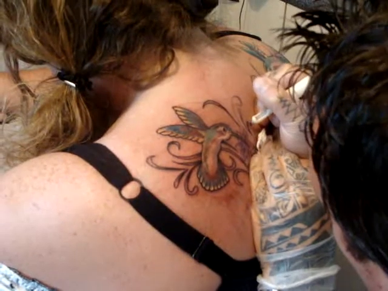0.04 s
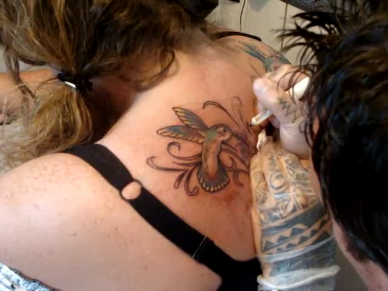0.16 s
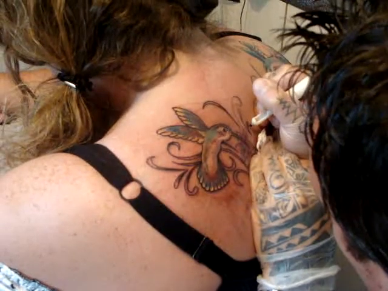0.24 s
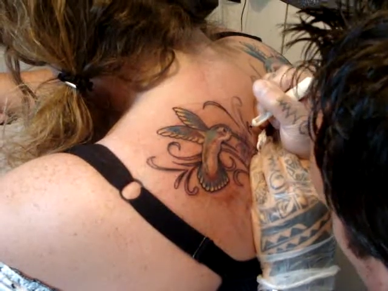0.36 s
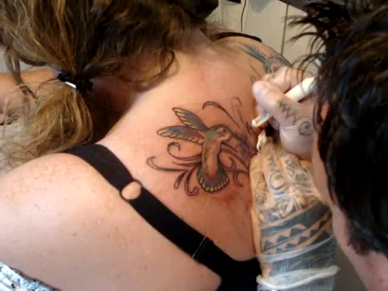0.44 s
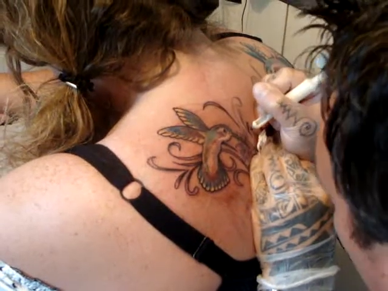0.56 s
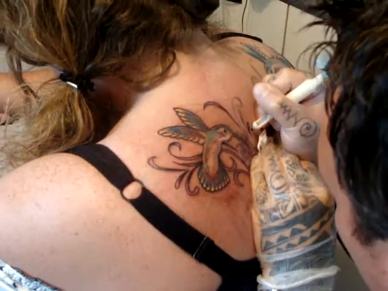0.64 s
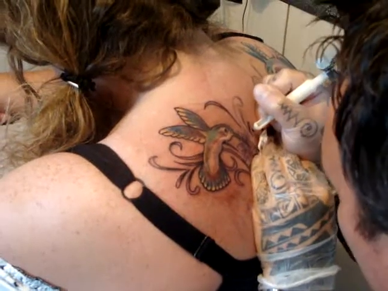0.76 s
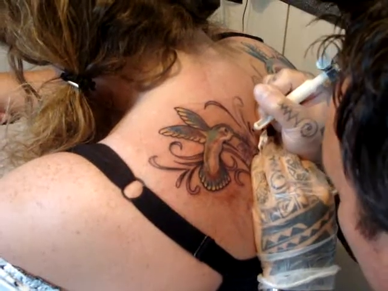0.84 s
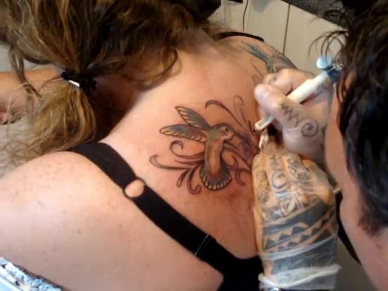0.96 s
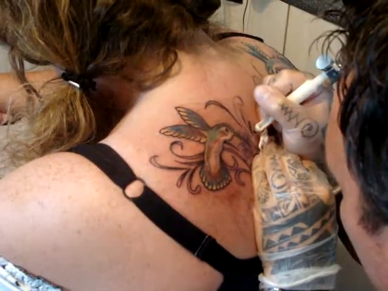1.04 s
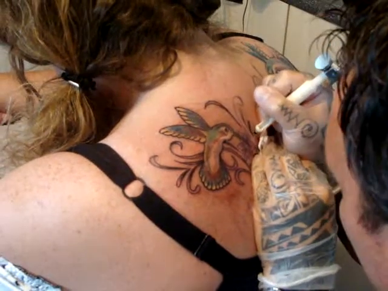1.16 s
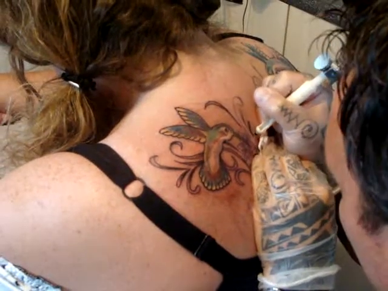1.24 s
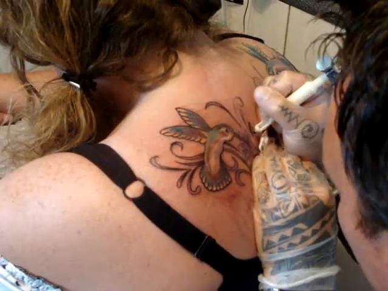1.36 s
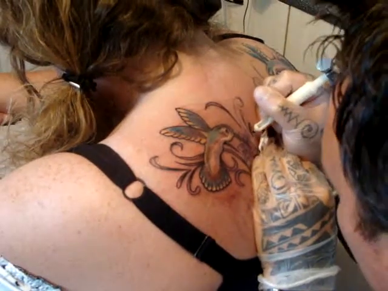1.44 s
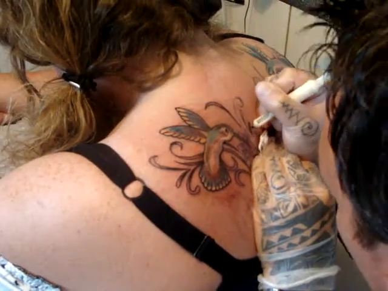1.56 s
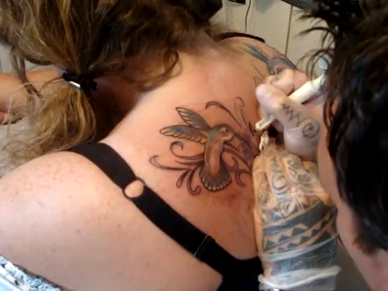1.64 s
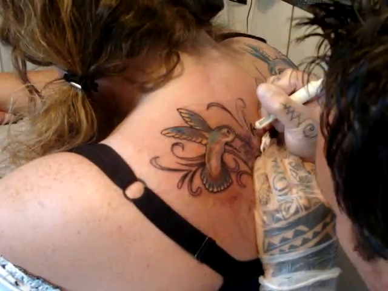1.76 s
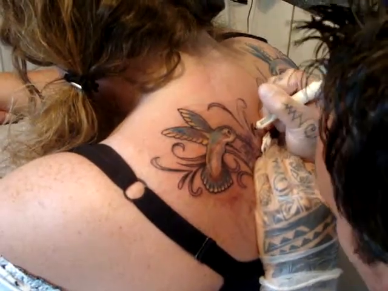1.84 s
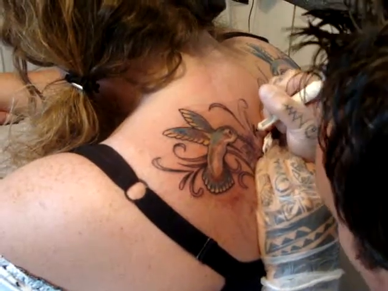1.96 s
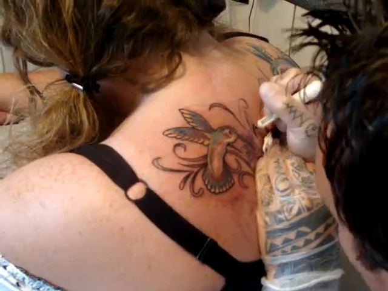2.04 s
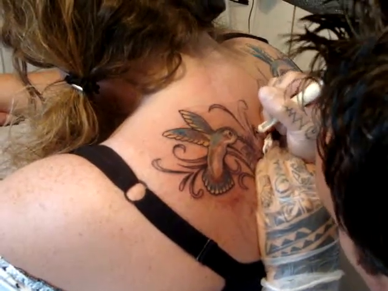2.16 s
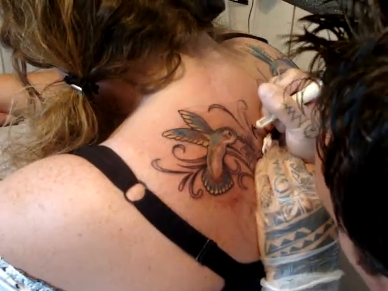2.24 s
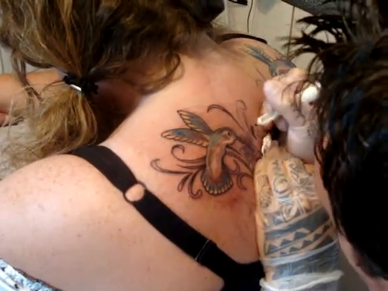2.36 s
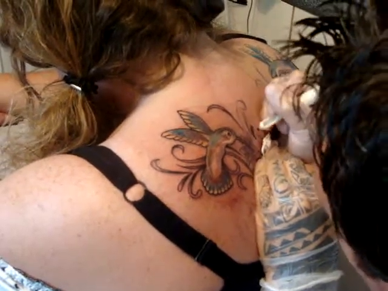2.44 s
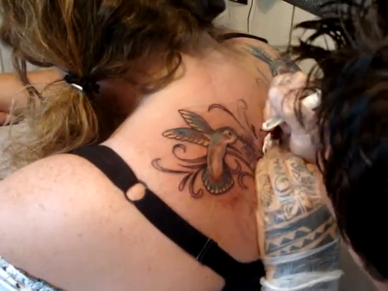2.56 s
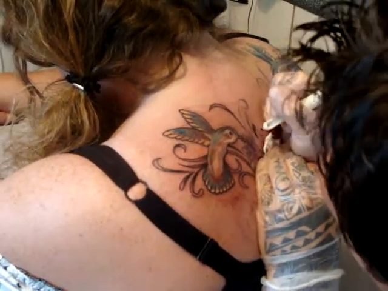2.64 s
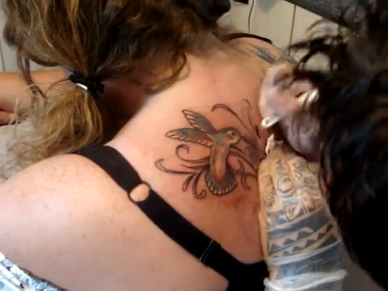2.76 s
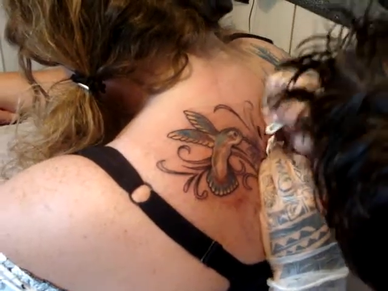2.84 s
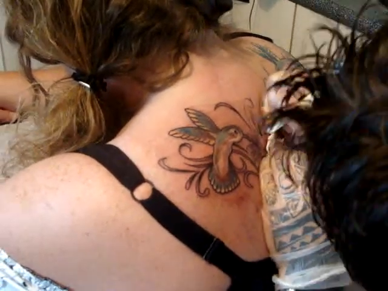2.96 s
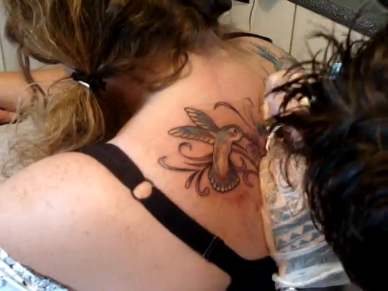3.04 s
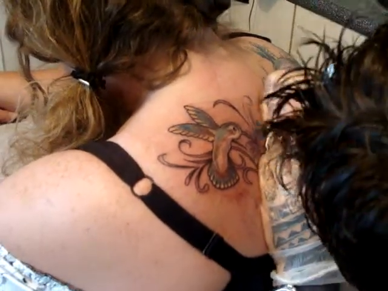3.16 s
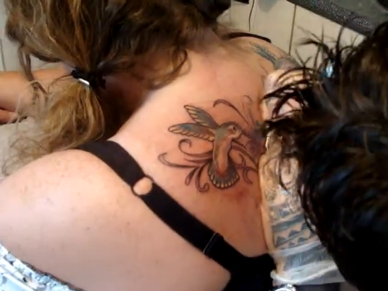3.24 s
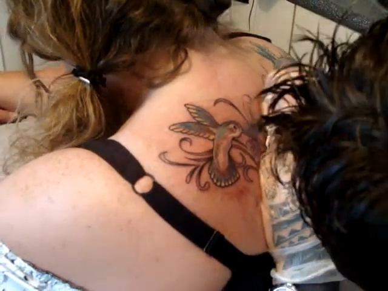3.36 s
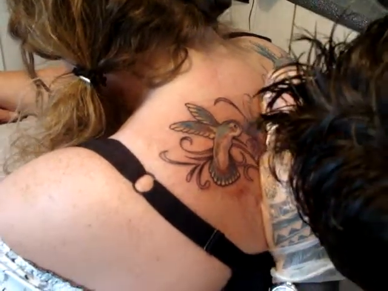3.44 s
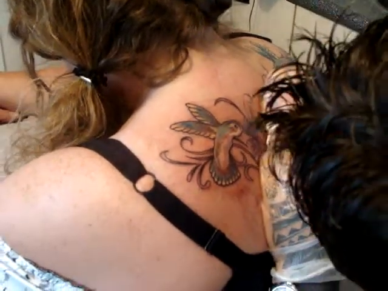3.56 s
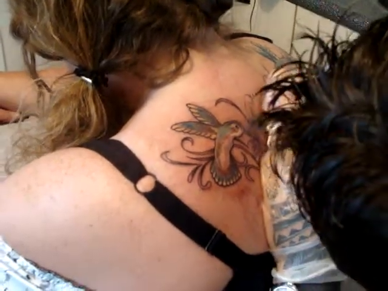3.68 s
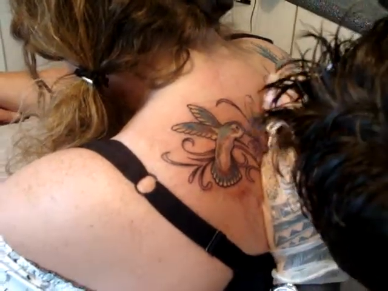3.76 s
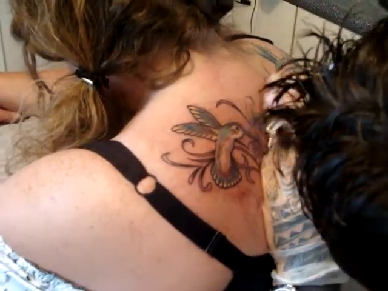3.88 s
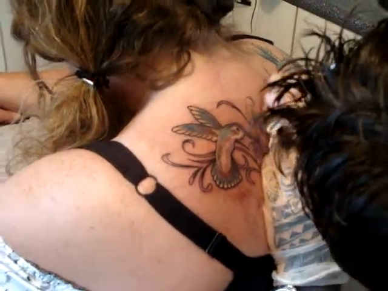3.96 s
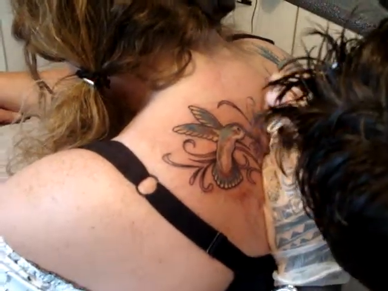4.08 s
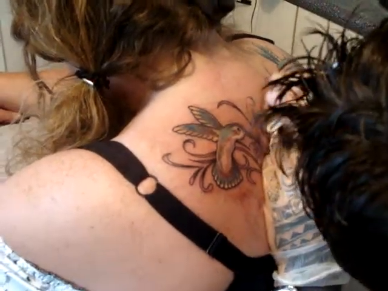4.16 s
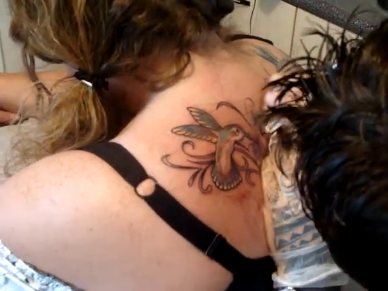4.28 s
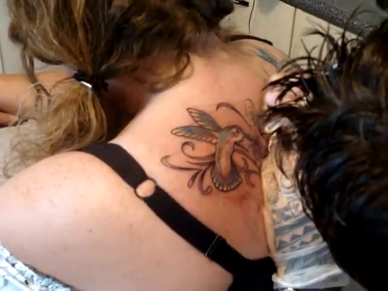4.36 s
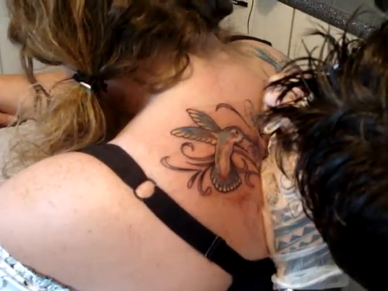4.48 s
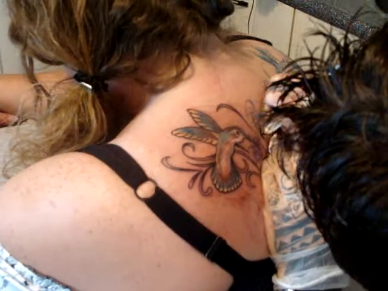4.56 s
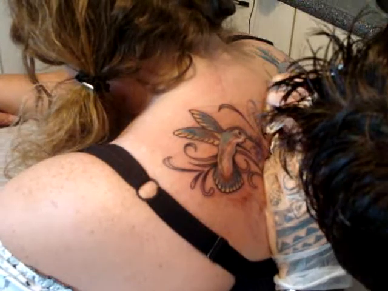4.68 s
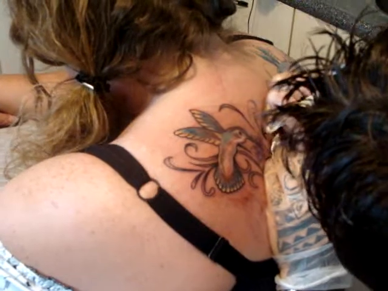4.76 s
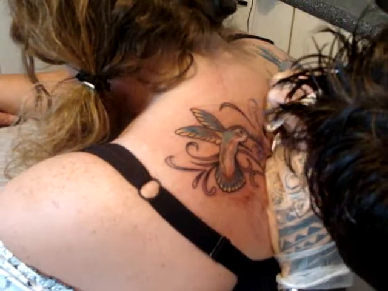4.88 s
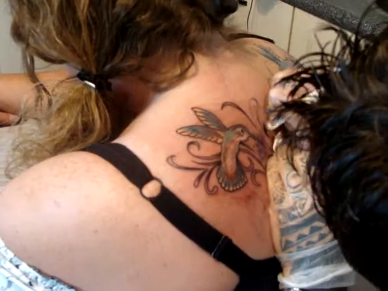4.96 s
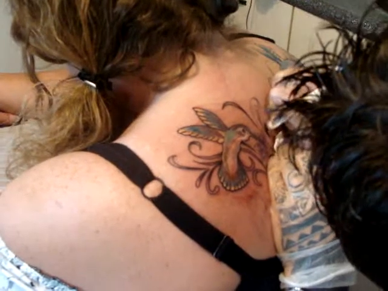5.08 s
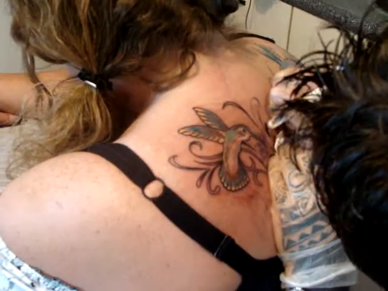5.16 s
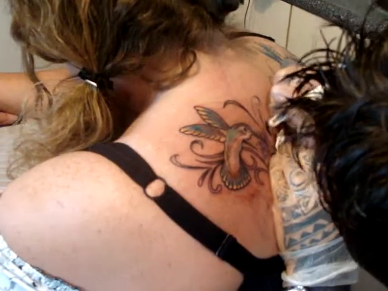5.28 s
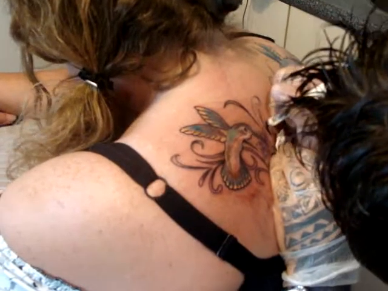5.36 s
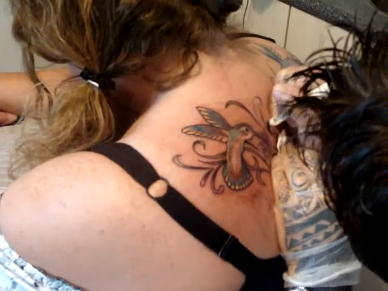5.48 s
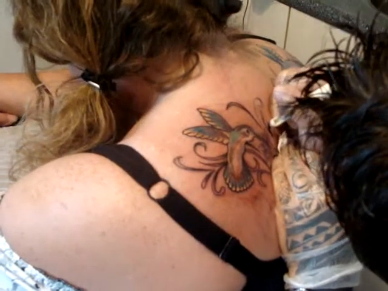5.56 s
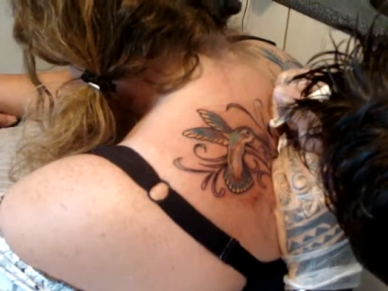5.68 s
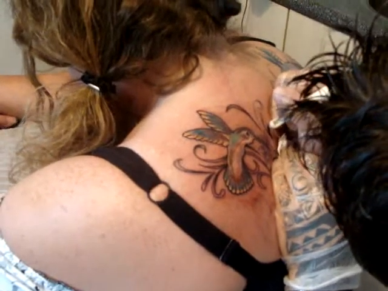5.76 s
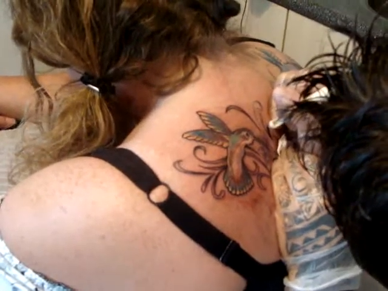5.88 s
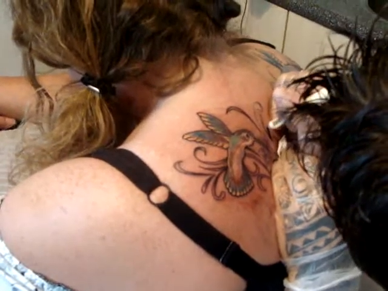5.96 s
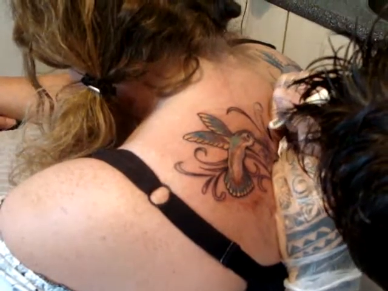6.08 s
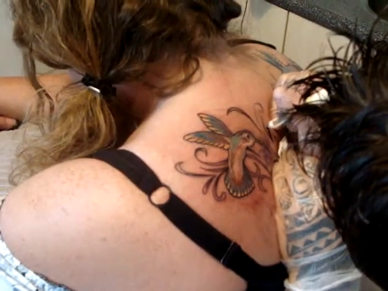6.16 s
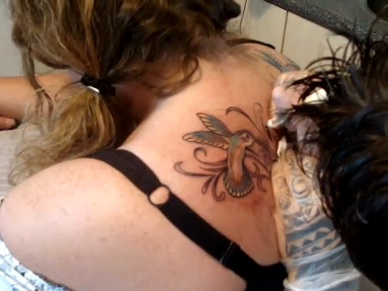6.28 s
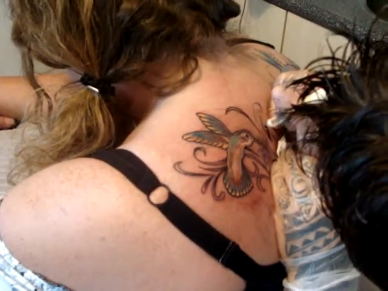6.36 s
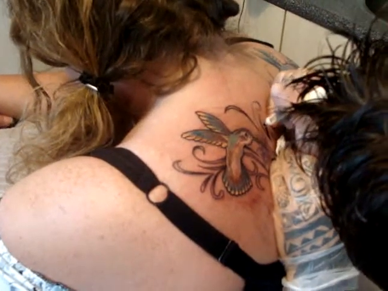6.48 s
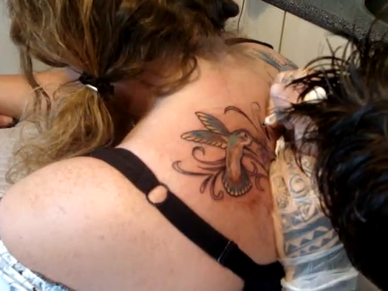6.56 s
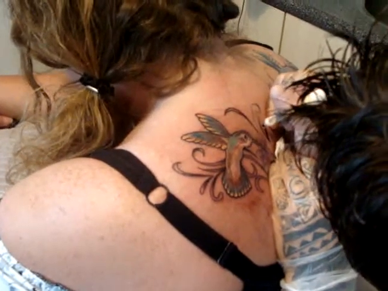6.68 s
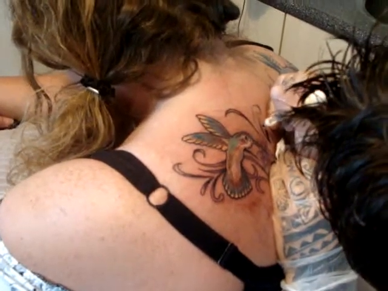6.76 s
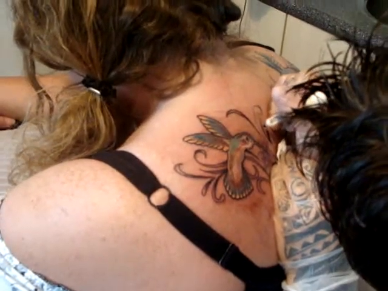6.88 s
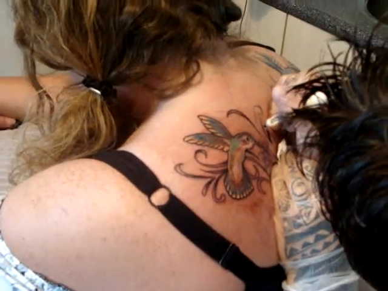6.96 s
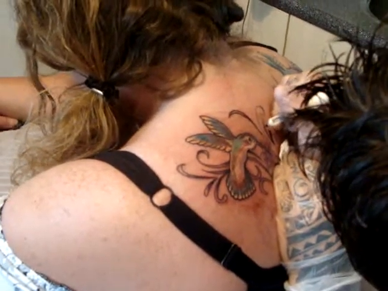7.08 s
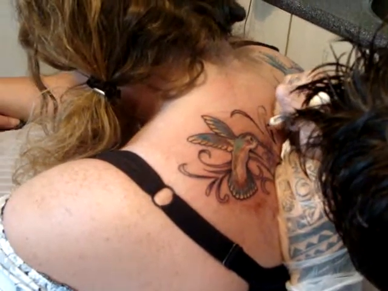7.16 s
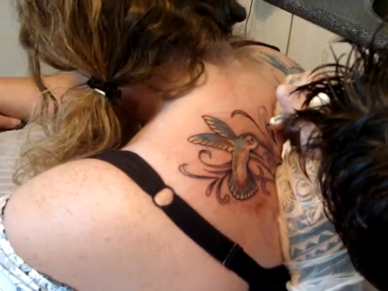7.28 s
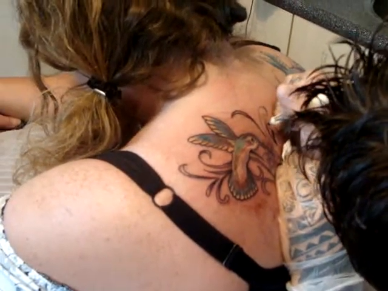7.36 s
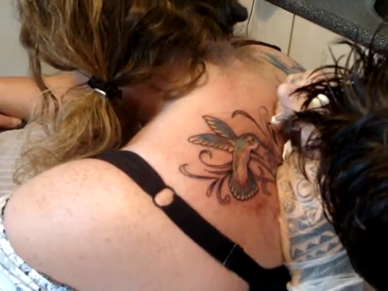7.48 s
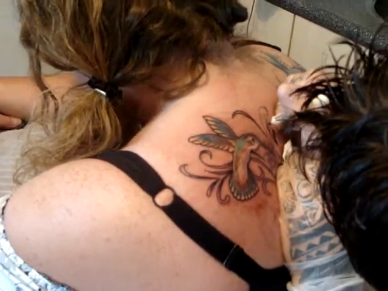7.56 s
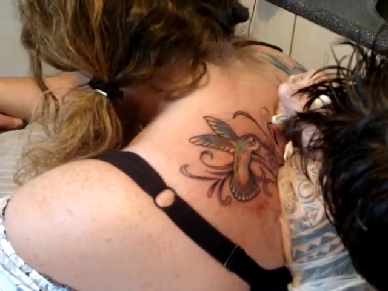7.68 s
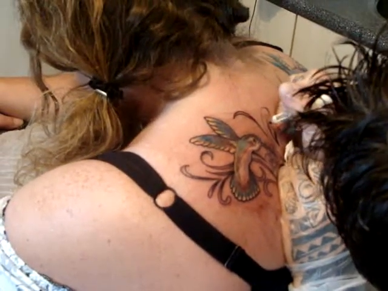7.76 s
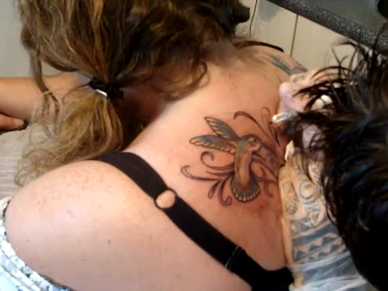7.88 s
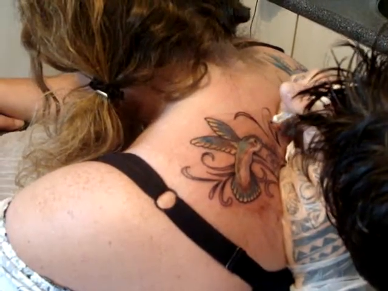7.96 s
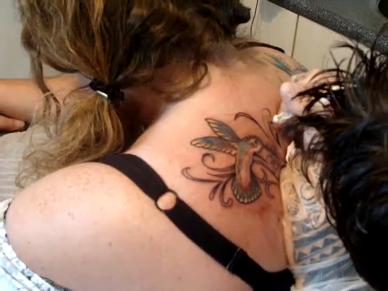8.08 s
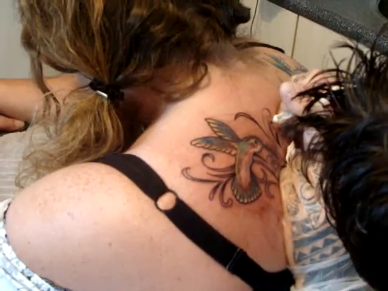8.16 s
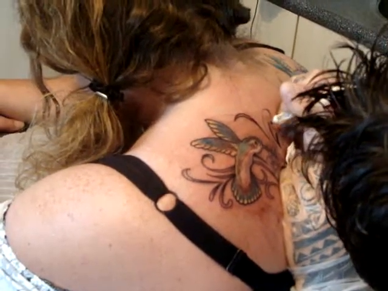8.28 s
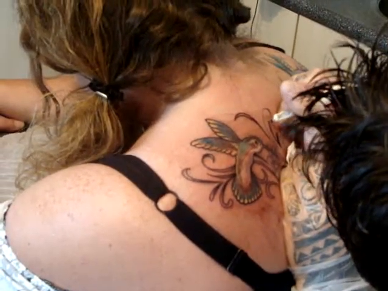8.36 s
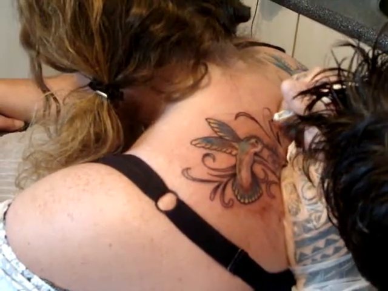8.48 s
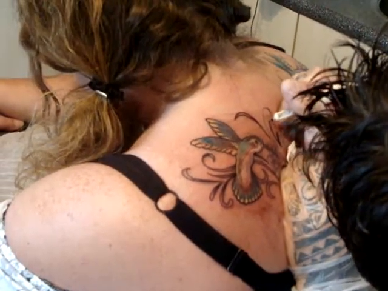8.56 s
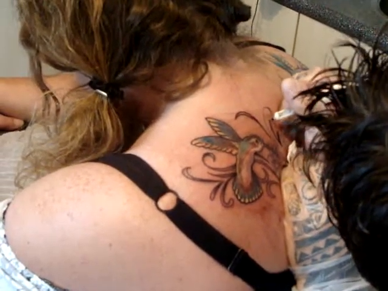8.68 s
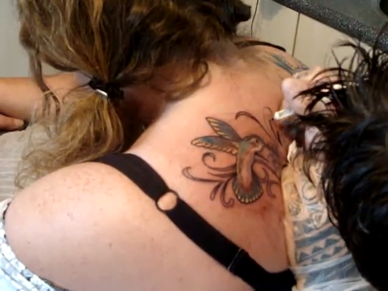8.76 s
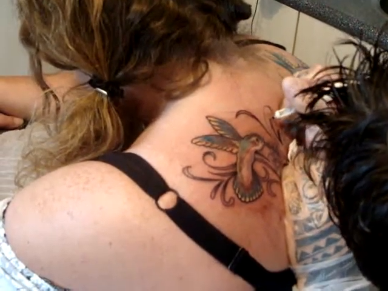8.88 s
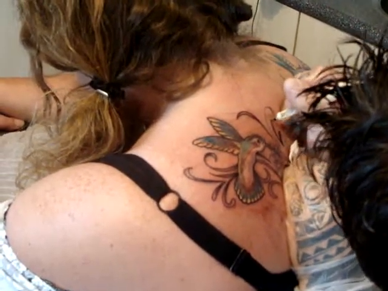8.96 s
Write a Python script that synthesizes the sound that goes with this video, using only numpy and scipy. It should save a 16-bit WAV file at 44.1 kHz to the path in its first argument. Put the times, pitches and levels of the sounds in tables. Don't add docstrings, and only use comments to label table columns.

```python
import sys
import numpy as np
from scipy import signal
from scipy.fft import rfft, irfft, next_fast_len
from scipy.io import wavfile
from scipy.ndimage import uniform_filter1d, map_coordinates

SR = 44100
rng = np.random.default_rng(int(sys.argv[2]) if len(sys.argv) > 2 else 0)


def ratio(d):
    e = np.asarray(d, float) / 20
    return 10 ** e


def dump(signal):
    limited = np.clip(np.atleast_2d(signal).T, -1, 1)
    pcm = np.round(limited * 32767).astype(np.int16)
    wavfile.write(sys.argv[1], SR, pcm)


N = 398223

# time in seconds, strokes per second, limp in microseconds
STROKE = [(0, 110.5, 4), (.8, 110.55, 5), (1.3, 111.4, 11), (1.56, 111.4, 8), (1.95, 112.6, 20),
          (2.47, 114.9, 30), (3.03, 113.7, 28), (3.2, 114.75, 35), (3.93, 114.3, 48), (4.08, 111.6, 13),
          (4.23, 112.3, 21), (4.4, 114.4, 49), (4.98, 114.35, 50), (5.13, 114, 78), (5.6, 114.2, 78),
          (5.9, 114.4, 42), (6.75, 114.2, 30), (9.03, 114.3, 48)]
# pedal down in seconds, pedal up in seconds.
RUNS = [
    (-.1, 2.464),
    (3.031, 9.2),
]
RESTART = 3.0322
# time in seconds, nearness in dB, squeeze on the frame 0-1, machine turned away 0-1.
HAND = [(0, -1, 0.6, 0.06), (.67, -2, 0.65, 0.06), (.73, -2, 0.68, 0), (1.3, 0, 0.99, 0.07),
        (1.45, -1, 0.63, 0.13), (2.25, -0.5, 0.67, 0.28), (2.45, 0.5, 0.43, 0.38), (3.03, 2, 0.66, 0.4),
        (3.2, -1.5, 0.83, 0.6), (3.5, -3, 0.77, 0.6), (4.25, -3.5, 0.63, 0.6), (4.42, -3.5, 0.53, 0.5),
        (5.0, -3, 0.46, 0.44), (5.55, -5, 0.33, 0.23), (5.75, -3, 0.12, 0.13), (6.75, -2.5, 0.1, 0.15),
        (7.0, -3, 0.21, 0.12), (9.03, -4, 0.24, 0.12)]
# time in seconds, length in seconds,
# jolt in dB.
SNAGS = [(1.39, 0.086, 1), (1.656, 0.027, 4.5), (1.892, 0.048, 5.5), (2.127, 0.054, 6.5),
         (2.367, 0.05, 8.5), (3.058, 0.13, 6), (3.993, 0.056, -2), (4.24, 0.041, -2.5),
         (4.416, 0.054, -1.5), (4.684, 0.014, 0.5), (5.628, 0.0035, -8), (5.892, 0.013, 3),
         (6.366, 0.051, -0.5), (6.9, 0.024, -0.5), (7.394, 0.055, 1)]
# place in the stroke 0-1, level in dB, time scatter in seconds,
# size scatter in dB.
CHATTER = [
    (.65, .5, .0002, 3),
    (.8, -6, .0006, 4),
    (.1, -3, .0006, 4),
    (.3, -15, .001, 5),
]
# place in the stroke 0-1, level in dB.
NEEDLE = [
    (0.108, -6.5),
    (0.423, 6),
]
# place in the stroke 0-1, level in dB.
TIP_TAPS = [
    (0, -8.5),
    (0.261, 8),
    (0.721, 10),
]

# pitch in Hz, width in Hz, level in dB.
ARMATURE_FRONT = [(7080, 680, -9), (8377, 325, 3), (9047, 350, 0.5), (9956, 105, -4.5)]
# pitch in Hz, width in Hz, level in dB.
ARMATURE_SIDE = [(6940, 3600, -11), (7994, 284, 3), (8670, 250, -3), (9050, 160, -4)]
# pitch in Hz, width in Hz, level in dB.
COLLAR = [(3355, 120, 0), (5150, 950, 0)]
# pitch in Hz, width in Hz, level in dB.
TUBE = [(2974, 690, -4), (3337, 73, 0.5), (3730, 67, 2), (4120, 1240, 1), (6160, 1160, 3)]
# pitch in Hz, width in Hz, level in dB.
TIP = [(4320, 1830, 0)]
# pitch in Hz, width in Hz, level in dB.
PINS = [(3367, 45, 0), (3710, 45, -4), (4170, 70, -2), (4330, 60, -5)]
# pitch in Hz, width in Hz, level in dB.
FRAME_IN_SKIN = [(2074, 133, 8.5), (2212, 197, 11.5), (2432, 430, 2.5)]
# pitch in Hz, width in Hz, level in dB.
FRAME_FREE = [(2007, 170, 7), (2225, 113, 10.5), (2580, 79, 0.5)]
# pitch in Hz, width in Hz, level in dB.
SKIN = [(2200, 720, 0)]
# pitch in Hz, width in Hz, level in dB.
GRIP_FIRM = [(1244, 150, -18.5), (1525, 64, -1.5), (1789, 53, 0.5)]
# pitch in Hz, width in Hz, level in dB.
GRIP_OPEN = [(1333, 490, -5.5), (1580, 84, 0.5), (1822, 197, 1.5)]
# pitch in Hz, width in Hz, level in dB.
PALM_FIRM = [(470, 340, -11), (919, 35, 6), (1350, 520, -6)]
# pitch in Hz, width in Hz, level in dB.
PALM_OPEN = [(508, 38, -1), (690, 110, -2), (800, 220, -2), (1013, 63, -9), (1242, 160, -4)]
# pitch in Hz, width in Hz, level in dB.
KNUCKLE = [(2480, 260, 0)]

# pitch in Hz, seconds to fade by 60 dB.
ROOM = [(200, 0.14), (2000, 1), (5000, 1), (8000, 0.37), (10000, 0.33)]
# pitch in Hz, level in dB.
SEND = [(1200, 0), (2200, -4), (2800, -1), (4600, -2), (5050, -8), (5350, -13), (5700, -7), (6000, -1),
        (10000, 1)]
# pitch in Hz, level in dB.
FAN_TONES = [
    (123.8, -3.5),
    (247.6, -13.5),
    (1997, -9.5),
]
# pitch in Hz, level in dB per Hz.
FAN_AIR = [(82, -29.5), (140, -12), (221, -41.5), (317, -7.5), (450, -27), (580, -57), (990, -120)]
# pitch in Hz, width in Hz, level in dB.
DUCT = [(325, 43, -5.5), (192, 22, -5)]
# pitch in Hz, level in dB per Hz.
STREET = [(240, -40.5), (400, -14), (560, -8.5), (700, -3), (850, -6), (1170, -8.5), (1750, -13),
          (2050, -13.5), (2400, -16), (3500, -14), (4500, -25.5), (6000, -27), (10200, -27.5),
          (13000, -85.5)]
# pitch in Hz, level in dB per Hz.
RUMBLE = [(20, -25.5), (35, -9.5), (55, -8.5), (80, -6), (110, -66.5)]
# time in seconds, half length in seconds, rise in dB.
CARS = [(2.0, 0.91, 6), (2.94, 0.096, 0), (3.13, 0.2, 3), (4.7, 0.3, 4.5), (5.97, 0.22, 6.5), (8.8, 1, 7)]
# time in seconds, half length in seconds, rise in dB.
JOLTS = [(1.05, 0.082, -10), (1.75, 0.28, 1), (3.05, 0.091, 3), (4.4, .1, 9), (5.3, .1, 2),
         (5.68, 0.29, 12), (6.4, 0.09, 8), (7.7, 0.35, 5)]
# time in seconds, pitch in Hz, level in dB.
PASSING = [(1.3, 752, -66), (1.5, 740, -60), (1.7, 715, -62.5), (1.85, 688, -52.5), (1.97, 657, -55.5),
           (2.08, 660, -61)]
# time in seconds, pitch in Hz, level in dB.
SQUEAL = [(2.72, 3250, -66), (2.745, 3235, -55), (2.77, 3225, -55), (2.82, 3225, -57), (2.9, 3285, -56.5),
          (2.95, 3310, -58), (3, 3335, -64)]
# time in seconds, level in dB.
PEDAL = [
    (3.032, -27),
    (3.041, -28),
    (3.049, -30),
    (7.143, -38),
    (7.255, -44),
]
# pitch in Hz, width in Hz, level in dB.
PEDAL_BOX = [(120, 80, -4), (450, 500, -1), (1100, 920, -2)]
# time in seconds, level in dB,
# pitch in Hz.
THUMPS = [(5.92, -45, 800), (5.96, -52, 794), (6.05, -44, 766), (6.1, -54, 620), (6.15, -57, 776),
          (5.729, -54, 190), (5.839, -58, 190), (6.151, -53, 190), (6.271, -53, 191), (6.46, -55, 192),
          (6.779, -53, 192), (6.901, -60, 190), (7.13, -57, 334), (7.6, -60, 190), (8.573, -52.5, 186)]
# lower edge in Hz, upper edge in Hz.
MUTED_BANDS = [(5100, 5520), (5520, 5900), (6100, 6500), (6600, 6900), (7550, 7950)]
MUTED_SHARE = [.07, .06, .03, .03, .012]
# pitch in Hz, level in dB.
EDGE = [(10020, 0), (10120, -12), (10200, -40), (10260, -80)]

SLAP_DB, FRAME_DB, GRIP_DB, TUBE_DB, PALM_DB, TIP_DB = -23.5, -38, -49, -34, -67, -45
SQUEEZE_FRAME_DB, SQUEEZE_GRIP_DB, SQUEEZE_TUBE_DB, SQUEEZE_PALM_DB, SQUEEZE_TIP_DB = -10.5, -0.5, -4.5, 12.5, 3.5
NEAR_GRIP, NEAR_TUBE, NEAR_PALM = 0.18, 0.3, -1.46
SNAG_SLAP, SNAG_FRAME, SNAG_TUBE, SNAG_PALM = -0.28, 0.55, 0.3, 0.82
SNAG_SPREAD = 1.43
TURN_TIP_DB = -6.5
COLLAR_DB, RATTLE_T60 = -6.5, 0.022
NOTCH_HZ, NOTCH_WIDTH_HZ = 5350, 380
PINS_DB, KNUCKLE_DB = -51, -49.5
KNUCKLE_START, KNUCKLE_STOP = 0.704, 1.36
HUM_DB, AIR_DB, STREET_DB, RUMBLE_DB = -71, -64.5, -49, -83.5
HISS_DB = -76
LIFT_DB, LIFT_RISE_S, LIFT_DROP_S = 18.5, 0.48, 0.044
MUTED_DB = -20
CEILING = .4


def unit(x):
    return x / np.sqrt(np.mean(x ** 2) + 1e-20)


def along(points, hz):
    f, v = np.transpose(points)
    return np.interp(np.log(hz + 1), np.log(f + 1), v)


def curves(rows):
    s, *cols = np.transpose(rows)
    return [np.interp(np.arange(N) / SR, s, c) for c in cols]


def sounding(start, stop, fade):
    t = np.arange(N) / SR
    return np.clip(np.minimum(t - start, stop - t) / fade, 0, 1)


def wobble(rate):
    at = np.arange(0, N + 32, 32)
    knots = rng.standard_normal(int(N * rate / SR) + 4)
    return np.interp(np.arange(N), at, map_coordinates(knots, [at * rate / SR]))


def swells(rows, spread=1):
    t = np.arange(0, N / SR, .002)
    db = sum(db * np.exp(-((t - s) / (spread * length)) ** 2) for s, length, db in rows)
    return np.interp(np.arange(N) / SR, t, db)


def hiss():
    return rng.standard_normal(N)


def filtered(x, response):
    m = next_fast_len(N + 8192, True)
    return irfft(rfft(x, m) * response(np.fft.rfftfreq(m, 1 / SR)), m)[..., :N]


def resonant(x, modes, order=1):
    def body(f):
        total = 0
        for k, (center, width, db) in enumerate(modes):
            ring = 1 - 1j * (center * center - f * f) / (width * f + 1e-9)
            total = total + (-1) ** k * ratio(db) / ring
        return total
    return unit(filtered(x, lambda f: body(f) ** order))


def coloured(spectrum):
    return unit(filtered(hiss(), lambda hz: ratio(along(spectrum, hz))))


def pulses(at, size):
    spot = np.floor(at)[:, None].astype(int) + np.arange(-7, 9)
    gap = spot - at[:, None]
    shape = size[:, None] * np.sinc(gap) * np.cos(np.pi * gap / 16) ** 2
    return np.bincount(np.clip(spot, 0, N - 1).ravel(), shape.ravel(), N)


def gritty(clicks, t60, length):
    fade = ratio(-60 * np.arange(length) / SR / t60)
    return signal.fftconvolve(clicks, fade)[:N] * hiss()


def running():
    return sum(sounding(down, up, .0015) for down, up in RUNS)


def strokes():
    rate, limp = curves(STROKE)
    phase = np.cumsum(rate * (1 + (.0005 + .00004 * limp) * wobble(22))) / SR + .45
    phase[round((RESTART - .2) * SR):] += -phase[round(RESTART * SR)] % 1
    stroke = np.arange(1, int(phase[-1]))

    def when(place):
        return np.interp(stroke + place, phase, np.arange(N))

    def luck():
        return rng.uniform(-1, 1, 1100)[:len(stroke)]

    begin = when(0).astype(int)
    slip = np.tanh(2 * (.7 + wobble(14)))[begin]
    loose = (limp * 1e-6 * SR)[begin]
    drag = loose * ((-1.) ** stroke * slip + .4 * luck())
    stumble = sum(np.exp(-((when(0) / SR - s) / length) ** 2) for s, length, _ in SNAGS)
    drag += .00016 * SR * stumble * luck()
    return when, luck, loose, drag


def spring_chatter(when, luck, loose):
    _, limp = curves(STROKE)
    _, squeeze, turned = curves(HAND)
    early = .07 * np.clip(1 - loose / SR / 30e-6, 0, 1)
    ticks = 0
    for place, db, scatter, scatter_db in CHATTER:
        at = when(place - early * (place > .5)) + scatter * SR * luck()
        ticks = ticks + pulses(at, ratio(db + scatter_db * luck()))
    level = (.55 + .009 * limp) * (1 - .5 * turned)
    chatter = level * unit(.55 * unit(ticks) + unit(gritty(ticks, .004, 400)))
    firm = np.clip(4 * squeeze - 1, 0, 1)
    damped = filtered(chatter, lambda hz: 1.15j * hz * 2200 / (9000 ** 2 - hz * hz + 2200j * hz))
    return (1 - firm) * chatter + firm * damped


def armature_slap(when, luck, drag, chatter, jolt_db):
    near_db, _, turned = curves(HAND)
    slap_db = SLAP_DB + near_db + 3 * turned + SNAG_SLAP * jolt_db + 0.24 * wobble(8)
    blow = .65 * unit(pulses(when(0) + .4 * drag + .4 * luck(), ratio(1.7 * luck())))
    strike = running() * (blow + chatter + .2 * hiss())
    strike = filtered(strike, lambda hz: (1j * hz / (9000 + 1j * hz)) ** 4)
    side = np.clip(turned + 0.023 * wobble(5.5), 0, 1)
    facing = np.sqrt(1 - side) * resonant(strike, ARMATURE_FRONT) + np.sqrt(side) * resonant(strike, ARMATURE_SIDE)
    return ratio(slap_db + 0.56 * wobble(36)) * facing


def tube_rattle(when, luck, loose, drag, chatter, jolt_db):
    _, limp = curves(STROKE)
    near_db, squeeze, turned = curves(HAND)
    on = running()
    tube_db = TUBE_DB + NEAR_TUBE * near_db + SQUEEZE_TUBE_DB * squeeze
    tube_db = tube_db + SNAG_TUBE * jolt_db + 0.53 * np.minimum(jolt_db, 0) + 0.57 * wobble(6.0)
    kick = pulses(when(0) + drag + (1.1 + .02 * loose / SR * 1e6) * luck(), ratio(1.5 * luck()))
    scrape = gritty(abs(kick), .007, 600)
    collar = resonant(on * (unit(kick) + 0.36 * unit(scrape)), COLLAR, order=2)
    paths = rng.standard_normal((2, 600)) * ratio(-60 * np.arange(600) / SR / RATTLE_T60)
    paths = rfft(paths, 2048)
    paths = irfft(paths / abs(paths))
    sway = .5 * wobble(18)
    rattle = signal.fftconvolve(kick * [np.cos(sway), np.sin(sway)], paths, axes=1)[:, :N].sum(axis=0)
    knocks = sum(pulses(when(place) + 1.2 * drag + 1.5 * luck(), ratio(db + 4 * luck())) for place, db in NEEDLE)
    load = np.clip(limp / 35, .2, 1) * np.clip(0.11 + 1.9 * squeeze, 0, 1)
    shaking = .25 * unit(kick) + .65 * unit(rattle) + (.12 + .007 * limp) * unit(scrape)
    shaking = shaking + .4 * load * unit(knocks) + .06 * chatter + .07 * hiss()
    tube = ratio(tube_db - 1) * resonant(on * shaking, TUBE)
    taps = sum(pulses(when(place) + 0.41 * drag + 1.9 * luck(), ratio(db + 3.4 * luck())) for place, db in TIP_TAPS)
    tip = resonant(on * (unit(taps) + .45 * hiss()), TIP, order=2)
    tube += ratio(TIP_DB + SQUEEZE_TIP_DB * squeeze + TURN_TIP_DB * turned + 0.48 * wobble(10.0)) * tip
    tube = filtered(tube, lambda hz: 1 - .8 * np.exp(-((hz - NOTCH_HZ) / NOTCH_WIDTH_HZ) ** 2))
    return ratio(tube_db + COLLAR_DB) * collar + tube


def frame_ring(shock, jolt_db):
    _, limp = curves(STROKE)
    _, squeeze, _ = curves(HAND)
    frame_db = FRAME_DB + SQUEEZE_FRAME_DB * squeeze + SNAG_FRAME * jolt_db + 0.56 * wobble(5.8)
    shaken = resonant(shock(.07, 1.3), [(2230, 750, 0)])
    sunk = np.clip(limp / 10 - .4, 0, 1)
    throb = .8 * resonant(shock(.1, 1.3), SKIN, order=4) + .35 * resonant(shaken, FRAME_IN_SKIN)
    return ratio(frame_db) * ((1 - sunk) * resonant(shaken, FRAME_FREE) + sunk * throb)


def steel_pins(shock):
    return ratio(PINS_DB + 2 * wobble(6)) * resonant(shock(0, .35), PINS)


def holding_hand(shock, jolt_db, resting):
    _, limp = curves(STROKE)
    near_db, squeeze, _ = curves(HAND)
    grip_db = GRIP_DB + NEAR_GRIP * near_db + SQUEEZE_GRIP_DB * squeeze + jolt_db + 0.42 * wobble(10.0)
    palm_db = PALM_DB + NEAR_PALM * near_db + SQUEEZE_PALM_DB * squeeze + SNAG_PALM * jolt_db + 3.0 * wobble(7)
    held = shock(-.12, .9) + (.15 + .005 * limp) * running() * hiss()
    shut = np.clip(1.39 * squeeze - .35, 0, 1)
    felt = resonant(held, [(1625, 350, 0)])
    grip = ratio(grip_db) * (shut * resonant(felt, GRIP_FIRM) + (1 - shut) * resonant(felt, GRIP_OPEN))
    palm = ratio(palm_db) * (shut * resonant(held, PALM_FIRM) + (1 - shut) * resonant(held, PALM_OPEN))
    knuckle = ratio(KNUCKLE_DB) * resting * resonant(held, KNUCKLE, order=2)
    return grip + palm * ratio(-6 * resting) + knuckle


def machine():
    when, luck, loose, drag = strokes()
    jolt_db = swells(SNAGS, SNAG_SPREAD)
    size = ratio(2 * luck())

    def shock(place, share):
        return running() * (unit(pulses(when(place) + share * drag, size)) + .14 * hiss())

    chatter = spring_chatter(when, luck, loose)
    slap = armature_slap(when, luck, drag, chatter, jolt_db)
    tube = tube_rattle(when, luck, loose, drag, chatter, jolt_db)
    resting = sounding(KNUCKLE_START, KNUCKLE_STOP, .05)
    frame = frame_ring(shock, jolt_db) * ratio(-4.5 * resting)
    return slap + tube + steel_pins(shock) + frame + holding_hand(shock, jolt_db, resting)


def room(x):
    hz, t, z = signal.stft(rng.standard_normal((2, SR // 2)), SR, nperseg=256)
    tails = signal.istft(z * ratio(-60 * t / along(ROOM, hz)[:, None]), SR, nperseg=256)[1]
    turn = 1.3 * wobble(4)
    sent = np.pad(x * [np.cos(turn), np.sin(turn)], ((0, 0), (200, 0)))
    return signal.fftconvolve(sent, tails / np.linalg.norm(tails[0]), axes=1)[:, :N].sum(axis=0)


def lift():
    t = np.arange(N) / SR
    (_, stop), (start, _) = RUNS
    rise = LIFT_DB * (1 - np.exp(-np.clip(np.minimum(t, start) - stop, 0, None) / LIFT_RISE_S))
    return rise * np.clip(1 - (t - start) / LIFT_DROP_S, 0, 1)


def studio():
    turn = 2 * np.pi * np.cumsum(1 + 0.0015 * wobble(1.7)) / SR
    tones = sum(ratio(db) * np.sin(hz * turn) for hz, db in FAN_TONES)
    hum = ratio(HUM_DB + 7.5 + 1.2 * wobble(1.5)) * tones
    air = ratio(AIR_DB + 1.7 * wobble(7.1)) * (0.8 * coloured(FAN_AIR) + 0.6 * resonant(hiss(), DUCT))
    street = ratio(STREET_DB - 10.0 + swells(CARS) + 0.89 * wobble(9.6)) * coloured(STREET)
    rumble = ratio(RUMBLE_DB + swells(JOLTS) + 1.7 * wobble(6.4)) * coloured(RUMBLE)
    return ratio(lift()) * (hum + air + street + rumble) + ratio(HISS_DB + 0.32 * lift()) * hiss()


def whine(rows, drift_hz, flutter_db):
    hz, db = curves(rows)
    tone = np.sin(2 * np.pi * np.cumsum(hz + drift_hz * wobble(44.0)) / SR)
    return ratio(db + 3 + flutter_db * wobble(25)) * sounding(rows[0][0], rows[-1][0], .04) * tone


def pedal():
    s, db = np.transpose(PEDAL)
    snaps = resonant(pulses(s * SR, ratio(db)), PEDAL_BOX)
    return ratio(db.max()) * snaps / abs(snaps).max()


def thumps():
    out, t = np.zeros(N + SR), np.arange(SR // 5) / SR
    for s, db, hz in THUMPS:
        b, a = signal.butter(1, [hz * 0.92, hz * 1.04], "bandpass", fs=SR)
        swell_and_fade = ratio(-60 * t / 0.41) * (1 - np.exp(-t / 0.014))
        puff = signal.lfilter(b, a, rng.standard_normal(len(t)) * swell_and_fade)
        out[round(s * SR):][:len(t)] += ratio(db) * puff / abs(puff).max()
    return out[:N]


def muting(x):
    hz, _, z = signal.stft(x, SR, nperseg=512, noverlap=384)
    for (lo, hi), share in zip(MUTED_BANDS, MUTED_SHARE):
        band = (hz >= lo) & (hz < hi)
        power = (abs(z[0, band]) ** 2).sum(axis=0)
        level = np.log(uniform_filter1d(power, size=4) + 1e-20)
        level -= np.minimum(*[uniform_filter1d(level, size=31, origin=way) for way in (-15, 15)])
        z[0, band] *= np.where(level < np.quantile(level, share), ratio(MUTED_DB), 1)
    return signal.istft(z, SR, nperseg=512, noverlap=384)[1][:, :N]


def scene():
    near = machine() + pedal() + thumps()
    echo = room(filtered(near, lambda hz: ratio(along(SEND, hz))))
    engine = whine(PASSING, drift_hz=10, flutter_db=4) * ratio(-1.5)
    brakes = whine(SQUEAL, drift_hz=5, flutter_db=2) * ratio(1.5)
    return (ratio(-.6) * near + ratio(-9.5) * echo + engine + brakes + studio())[None]


def low_pass(x):
    return signal.sosfilt(signal.butter(12, 10410, fs=SR, output="sos"), x)


def record(dry):
    limited = CEILING * np.tanh(dry / CEILING)
    mix = filtered(muting(limited), lambda hz: ratio(along(EDGE, hz)))
    return low_pass(mix)


dry = scene()
out = record(dry)
dump(out)
```